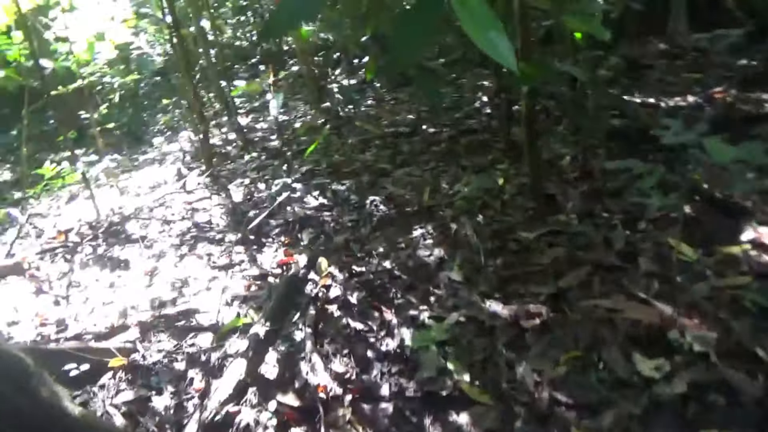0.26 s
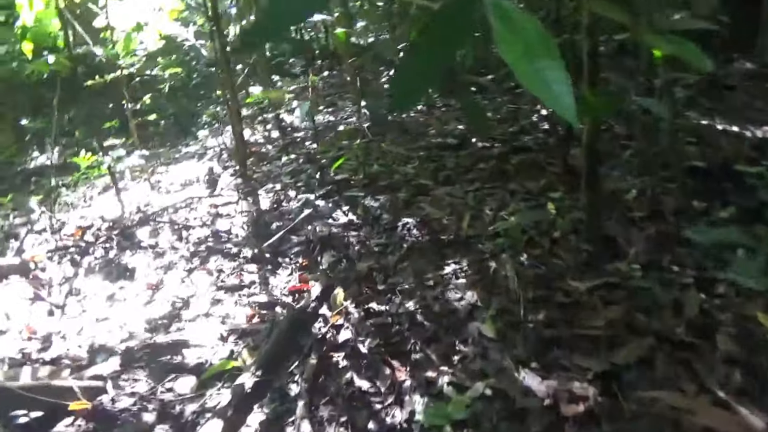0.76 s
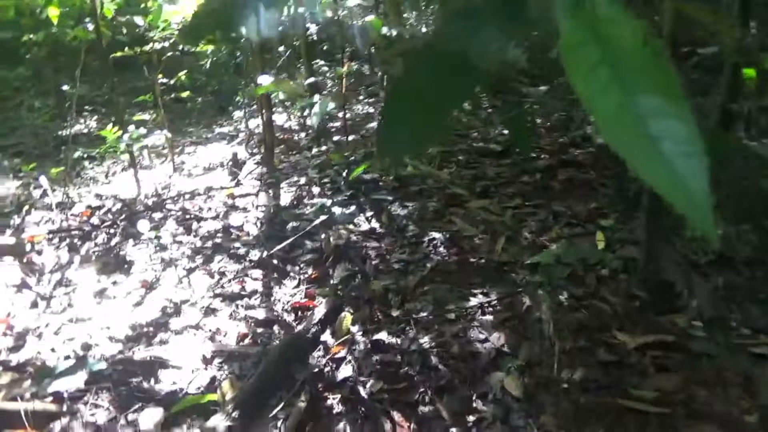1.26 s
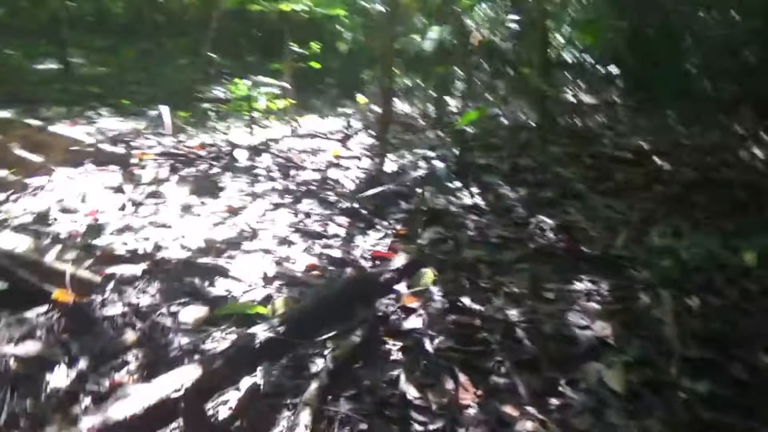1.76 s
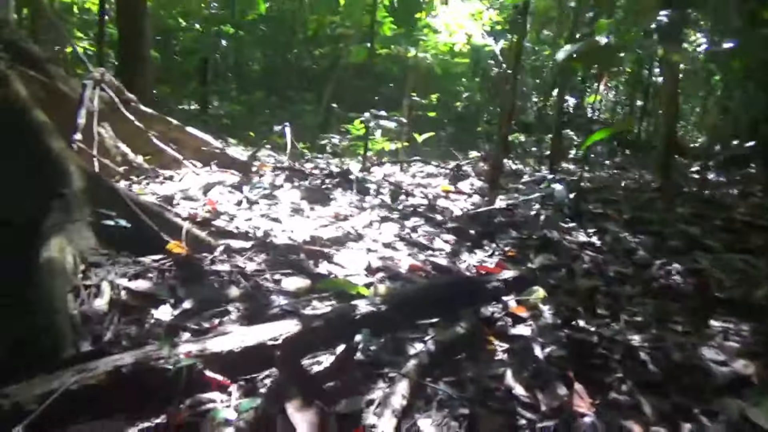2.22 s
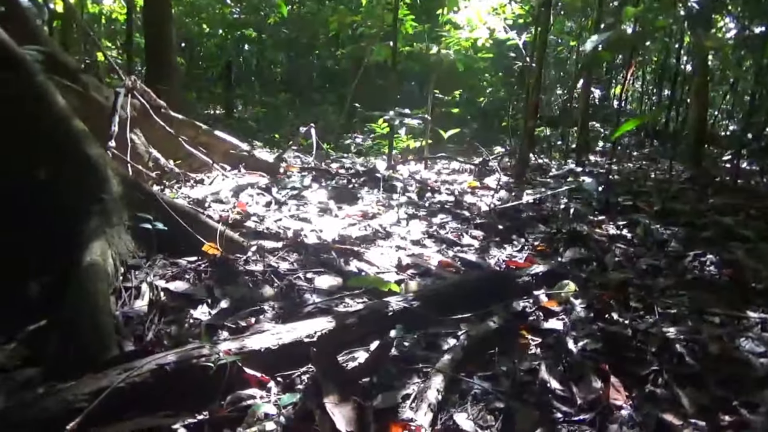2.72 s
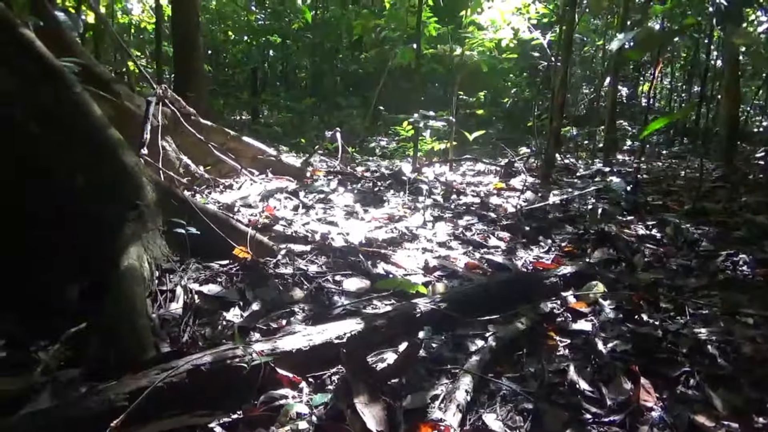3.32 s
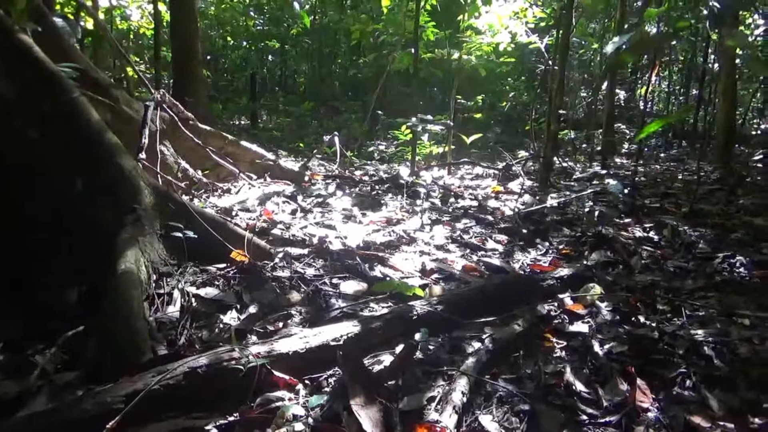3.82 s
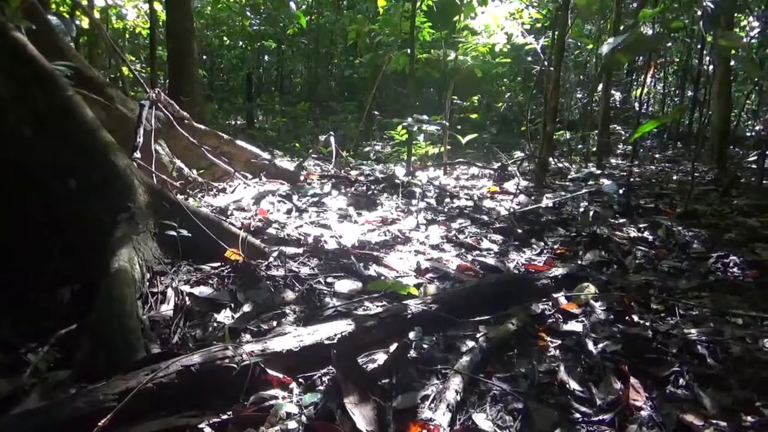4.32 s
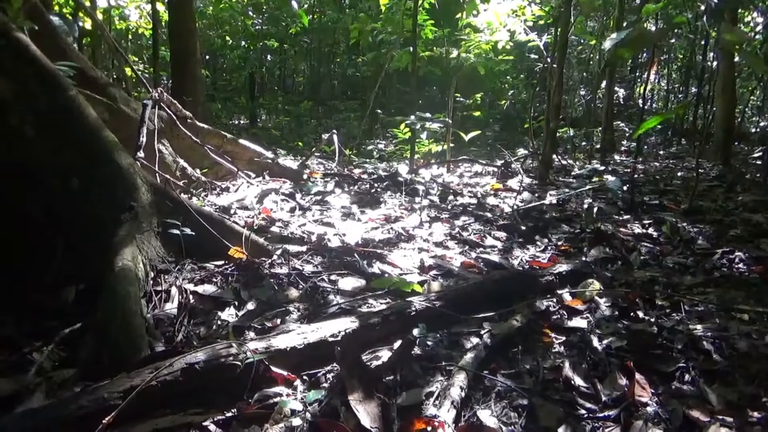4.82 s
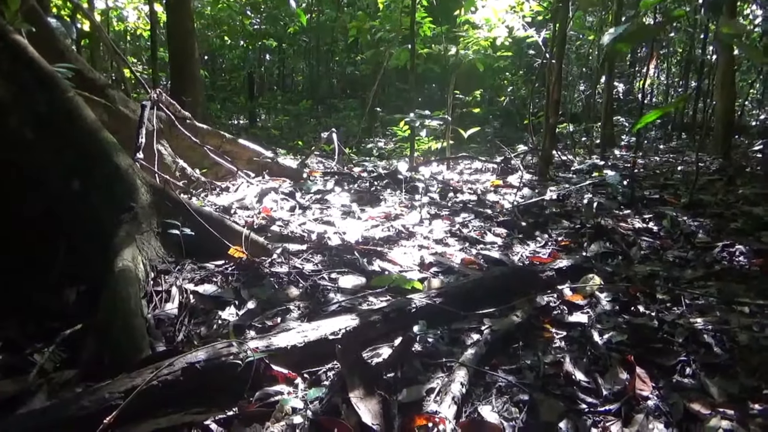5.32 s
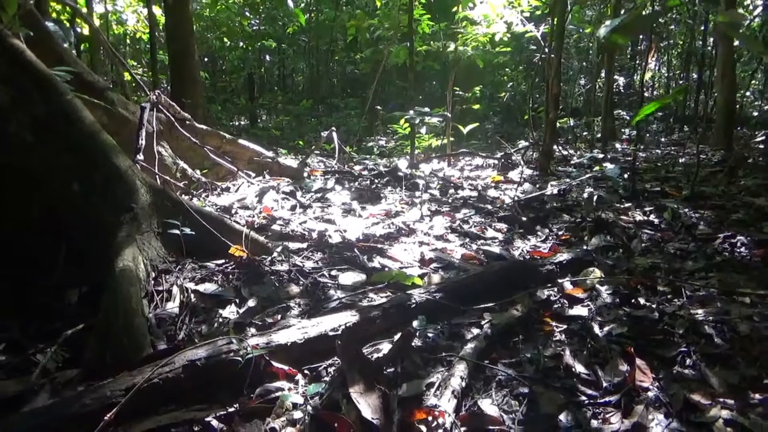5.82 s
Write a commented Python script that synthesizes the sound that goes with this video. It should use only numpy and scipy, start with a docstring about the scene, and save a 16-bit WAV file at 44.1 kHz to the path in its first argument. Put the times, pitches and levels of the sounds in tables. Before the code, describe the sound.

Throughout about six seconds, distant cicadas make a dense, shrill wash, strongest in the high treble, with a weaker mid band and a low buzzing strand that flutters and swells briefly near 1.3 and 2.5 s. Close by, dry leaf litter rustles very quietly in uneven grains, from dull scuffs to crisp crackle. At 0.2 s a tiny sharp click sounds with a soft thud; faint ticks follow at 0.8-0.9 and 1.6 s. Rustling rises around 2 s, with a woody double knock at 2.05 s and small muffled thuds until 2.5 s. From 3 to 4.4 s the litter is calmer. A faint tick at 4.5 s precedes a loud dry twig snap and thud at 4.7 s, then a small tap at 4.8 s. Soft low thuds come at 5.6 s as the rustle slightly returns. Faint low air noise underlies everything; mono, dry, dulled at the extreme top.

```python
"""A far chorus of cicadas over the floor of a tropical forest: clicks ring body resonances into a shrill wash.
Close by, leaf litter rustles as clumped grains of five colours and thuds softly as short dying tones.
Twigs tick now and then and one snaps loudly: noise bursts ring three twig resonances.
Faint low air noise lies beneath. One microphone feeds both channels, through a gain control that ducks
loud moments and a steep treble cut."""
import sys
import numpy as np
from scipy import signal
from scipy.fft import rfft, irfft, next_fast_len
from scipy.io import wavfile

SR = 44100
rng = np.random.default_rng(int(sys.argv[2]) if len(sys.argv) > 2 else 0)


def bounce(signal):
    """Save signal as a 16-bit WAV file at the path given by the first command-line argument."""
    frames = np.transpose(np.atleast_2d(signal))
    limited = np.clip(frames, -1, 1)
    pcm = np.round(limited * 32767).astype(np.int16)
    wavfile.write(sys.argv[1], SR, pcm)


N = 267687

# body resonances of the low, middle and high singers: centre_hz, width_hz, drive_db
LOW_BODY = [(1782, 178, 1), (2039, 420, -2), (2300, 200, -13), (2790, 190, -18)]
MIDDLE_BODY = [(3890, 790, -2.5), (4265, 610, -1)]
HIGH_BODY = [(5592, 1020, -2.5), (6026, 795, -0.5), (7710, 1150, -4.5), (8240, 1090, -4.5),
             (9410, 930, -8.5), (9990, 1320, -7.5)]
# swell of the low singers: time_s, level_db
LOW_SWELL = [(0, -52), (.6, -51), (1.05, -52), (1.26, -48.5), (1.6, -53), (2.1, -50), (2.36, -51.5),
             (2.49, -46), (2.6, -50), (2.95, -48), (3.4, -51), (3.9, -51), (4.45, -50), (4.97, -49.5),
             (5.3, -50.5), (5.5, -48.5), (6.07, -49.5)]
# slow swell of the other groups: time_s, middle_level_db, high_level_db
UPPER_SWELL = [(0, -56.5, -43.5), (.6, -57.5, -43.5), (1.3, -55.5, -44.5), (1.75, -57, -44.5),
               (3.4, -57.5, -45), (4.45, -55, -45), (5.2, -56.5, -45.3), (6.07, -52.5, -44.5)]

# spectra of the five litter grains, dull to crisp: frequency_hz, density_db (per Hz, relative)
SCUFF_SPECTRUM = [(40, -25), (100, -4.5), (200, 0.5), (400, 2.5), (520, 1), (800, -16)]
HOLLOW_SPECTRUM = [(300, -11.5), (480, -1), (620, 5.5), (760, 2.5), (1000, -31)]
WOODY_SPECTRUM = [(650, -27), (850, -7), (1030, 2), (1200, -7.5), (1500, -23)]
SWISH_SPECTRUM = [(1000, -53), (1200, -3.5), (1400, -0.5), (1650, 1.5), (2100, -35)]
CRISP_SPECTRUM = [(2100, -15), (2500, -2.5), (3000, -9.5), (3500, -4.5), (4200, -16.5)]
# stirring of the litter, used only as a swing about each column's mean: time_s, scuff_db, rustle_db
STIRRING = [(0.0, -56.5, -63.5), (0.27, -64, -64), (0.49, -64, -69.5), (0.67, -67.5, -65.5),
            (1.0, -66, -62.5), (1.34, -61.5, -58.5), (1.77, -64.5, -69.5), (1.96, -58.5, -56),
            (2.15, -58.5, -55.5), (2.53, -68, -59.5), (2.76, -67, -56.5), (3.31, -71, -67.5),
            (4.18, -75.5, -69), (4.56, -66, -66.5), (5.22, -72, -71.5), (5.46, -74.5, -66.5),
            (5.85, -67, -64.5), (6.07, -70.5, -61)]
# scuff, woody, swish and crisp grains:
# mean_level_db, share_of_scuff_swing, share_of_rustle_swing, grains_per_s, clumping_db
GRAINS = [(-65, 0.94, .01, 1200, 2), (-67.5, 0.18, 0.58, 3500, -0.4), (-68, .01, 1.35, 3700, 1.83),
          (-64.5, .01, 0.45, 6000, 2.8)]
# level of the hollow middle of the rustle: time_s, level_db
HOLLOW_LEVEL = [(0.0, -59), (0.49, -64.5), (1.15, -57.5), (1.39, -59.5), (1.69, -67), (1.87, -62.5),
                (2.15, -59), (2.94, -65.5), (3.62, -69), (5.22, -68.5), (5.38, -67.5), (6.07, -61)]
HOLLOW_PER_S, HOLLOW_CLUMP_DB = 2500, 2

# twig ticks and snaps: start_s, knock_rms_db, crack_rms_db, length_s,
# thinness (factor on the knock's pitch and width)
TICKS = [(0.2234, -29, -39.5, 0.00052, 1.73), (0.226, -47.5, -46, 0.015, 0.8),
         (0.764, -53, -58, .0054, 0.97), (0.792, -55, -46, 0.0079, 1.5), (.900, -50, -52.5, 0.0077, 1.04),
         (1.567, -54, -56, 0.0077, 1.1), (1.582, -52, -49, 0.016, 0.92), (1.61, -55, -52, 0.011, 1.05),
         (2.044, -41.5, -54, 0.0017, 0.84), (2.055, -39.5, -39.5, 0.002, 0.9),
         (4.5, -54, -51, 0.0077, 1.05), (4.685, -35, -38.5, 0.0049, 1), (4.692, -40, -61, .0027, 0.78),
         (4.828, -50, -60, 0.0016, 0.84)]
# twig resonances for knock, crack and splinter: centre_hz, width_hz
TWIG = [(880, 790), (2700, 1170), (7200, 4700)]
# the splinter treble equals the crack at this level and grows this much faster: only hard breaks are bright
SPLINTER_EVEN_DB, SPLINTER_GROWTH = -39.5, 4.7

# soft thuds in the litter: start_s, peak_db, pitch_hz, t60_s
THUDS = [(.227, -48.5, 730, .024), (0.24, -44, 200, .02), (.401, -45, 420, 0.043),
         (0.766, -48.5, 240, 0.033), (.900, -50, 590, .02), (1.79, -46.5, 345, .023),
         (2.0445, -32, 480, .012), (2.054, -41, 393, 0.033), (2.141, -52, 140, 0.057),
         (2.167, -44.5, 422, 0.035), (2.285, -65, 70, .041), (2.468, -47.5, 450, .02),
         (4.499, -47, 413, 0.018), (4.6845, -29.5, 485, 0.021), (4.693, -45, 354, .033),
         (4.828, -41, 505, 0.0078), (5.572, -42, 246, 0.04), (5.576, -51, 122, 0.053)]
THUD_EDGE_CYCLES = 0.69   # rise time, in cycles of the tone

# spectrum of the air noise: frequency_hz, density_db (per Hz, relative)
AIR_SPECTRUM = [(15, -16), (40, -1.5), (100, 4), (400, 0), (1000, -4.5), (1600, -18), (3000, -57)]
AIR_DB = -69
DUCK_FROM_DB, DUCK_RATIO, DUCK_RELEASE_DB_S = -41.5, 0.15, 64
CUTOFF_HZ = 11015


def from_db(db):
    """Amplitude gain is 10 to the power of dB / 20."""
    return 10 ** (np.asarray(db) / 20)


def rms_one(x):
    """Normalisation: division by the root mean square gives rms 1."""
    return x / np.sqrt(np.mean(x ** 2) + 1e-20)


def in_time(rows):
    """Linear interpolation turns each column of a curve into one value a sample."""
    time_s, *columns = np.transpose(rows)
    return [np.interp(np.arange(N) / SR, time_s, column) for column in columns]


def drift(corner_hz):
    """Two-pole lowpass noise wanders slowly, at rms 1."""
    step = 40   # samples between computed values
    settling = 2000   # values discarded while the filter settles
    pole = np.exp(-2 * np.pi * corner_hz * step / SR)
    noise = rng.standard_normal(N // step + settling + 2)
    slow = signal.lfilter([1], [1, -2 * pole, pole * pole], noise)[settling:]
    return np.interp(np.arange(N) / step, np.arange(len(slow)), rms_one(slow))


def resonance(x, hz, width_hz):
    """A damped mode is a two-pole bandpass with a peak gain of about 1."""
    radius = np.exp(-np.pi * width_hz / SR)
    zeros = (1 - radius * radius) / 2 * np.array([1, 0, -1])
    poles = [1, -2 * radius * np.cos(2 * np.pi * hz / SR), radius * radius]
    return signal.lfilter(zeros, poles, x)


def rung_twice(x, hz, width_hz):
    """Two equal modes in cascade steepen the skirts, leaving dark valleys between resonances."""
    return resonance(resonance(x, hz, width_hz), hz, width_hz)


def clicks(per_s, spread_db):
    """A random impulse train, of uneven size and sign, has rms 1 after scaling."""
    sizes = from_db(spread_db * np.minimum(rng.exponential(1, N), 5)) * rng.choice([-1, 1], N)
    return rms_one(sizes * (rng.random(N) < per_s / SR))


def coloured(x, spectrum):
    """Spectral shaping: a frequency-domain gain, interpolated over log frequency, colours x; rms 1."""
    size = next_fast_len(N)
    hz = np.maximum(np.arange(size // 2 + 1) * SR / size, 1)
    points_hz, points_db = np.array(spectrum).T
    shape_db = np.interp(np.log(hz), np.log(points_hz), points_db)
    return rms_one(irfft(rfft(x, size) * from_db(shape_db), size)[:N])


def singers(body, per_s, throb_db, throb_hz):
    """Impulse excitation: dense tymbal clicks ring each body resonance, which throbs out of step."""
    out = 0
    for hz, width_hz, drive_db in body:
        train = clicks(per_s, spread_db=1.5) * from_db(drive_db + throb_db * drift(throb_hz))
        out = out + rung_twice(train, hz, width_hz)
    return rms_one(out)


def cicadas():
    """Incoherent superposition: three groups of singers blur into one wash."""
    low_db, = in_time(LOW_SWELL)
    middle_db, high_db = in_time(UPPER_SWELL)
    low = from_db(low_db) * singers(LOW_BODY, per_s=9000, throb_db=1.63, throb_hz=13.6)
    middle = from_db(middle_db) * singers(MIDDLE_BODY, per_s=15000, throb_db=1.0, throb_hz=12)
    high = from_db(high_db) * singers(HIGH_BODY, per_s=20000, throb_db=0.33, throb_hz=11)
    return low + middle + high


def litter():
    """Granular contact noise: dry leaves give clumped random impacts, coloured by grain size."""
    scuff_db, rustle_db = in_time(STIRRING)
    hollow_db, = in_time(HOLLOW_LEVEL)
    shared_clumps = drift(9.7)
    scuff_swing = scuff_db - scuff_db.mean()
    rustle_swing = rustle_db - rustle_db.mean()

    layers = [(HOLLOW_SPECTRUM, hollow_db, HOLLOW_PER_S, HOLLOW_CLUMP_DB)]
    spectra = [SCUFF_SPECTRUM, WOODY_SPECTRUM, SWISH_SPECTRUM, CRISP_SPECTRUM]
    for spectrum, (mean_db, by_scuff, by_rustle, per_s, clump_db) in zip(spectra, GRAINS):
        level_db = mean_db + by_scuff * scuff_swing + by_rustle * rustle_swing
        layers.append((spectrum, level_db, per_s, clump_db))

    out = 0
    for spectrum, level_db, per_s, clump_db in layers:
        patchy_db = clump_db * (0.71 * shared_clumps + 1.14 * drift(9))
        grains = coloured(clicks(per_s, spread_db=2.5), spectrum)
        out = out + from_db(level_db + patchy_db) * grains
    return out


def thuds():
    """Damped oscillation: each thing that drops on the leaves gives a soft-edged, dying tone."""
    t = np.arange(4410) / SR
    out = np.zeros(N + len(t))
    for start_s, peak_db, hz, t60_s in THUDS:
        decay = from_db(-60 * t / t60_s)
        soft_edge = 1 - np.exp(-(t * hz / THUD_EDGE_CYCLES) ** 2)
        thud = np.sin(2 * np.pi * hz * t) * decay * soft_edge
        at = round(start_s * SR)
        out[at:at + len(t)] += from_db(peak_db) * thud / np.max(np.abs(thud))
    return out[:N]


def ticks():
    """Fracture excitation: a noise burst of splintering rings the twig's knock, crack and treble modes."""
    t = np.arange(4410) / SR
    out = np.zeros(N + len(t))
    for start_s, knock_db, crack_db, length_s, thinness in TICKS:
        bright_db = SPLINTER_EVEN_DB + SPLINTER_GROWTH * (crack_db - SPLINTER_EVEN_DB)
        burst = rng.standard_normal(len(t)) * np.exp(-(t / length_s) ** 3)
        at = round(start_s * SR)
        for level_db, scale, (hz, width_hz) in zip([knock_db, crack_db, bright_db], [thinness, 1, 1], TWIG):
            rung = rung_twice(burst, scale * hz, scale * width_hz)
            to_rms_one = np.sqrt(length_s * SR / np.sum(rung ** 2))   # rms taken over the burst's length
            out[at:at + len(t)] += from_db(level_db) * rung * to_rms_one
    return out[:N]


def air():
    """Broadband noise, weighted to the low frequencies, forms a steady floor."""
    return from_db(AIR_DB) * coloured(rng.standard_normal(N), AIR_SPECTRUM)


def scene():
    """Linear superposition of all sources at one microphone, which feeds both channels."""
    mix = cicadas() + litter() + thuds() + ticks() + air()
    return np.tile(mix, (2, 1))


def record(dry):
    """Gain control compresses above a threshold and lets go slowly; an elliptic lowpass cuts the top."""
    power = signal.lfilter([.004], [1, -.996], dry[0] ** 2)
    level_db = 10 * np.log10(power + 1e-12)
    # a running maximum against a rising ramp holds each peak and releases it at a constant dB rate
    ramp_db = DUCK_RELEASE_DB_S * np.arange(N) / SR
    held_db = np.maximum.accumulate(level_db + ramp_db) - ramp_db
    excess_db = np.maximum(held_db - DUCK_FROM_DB, 0)
    duck_db = signal.lfilter([.003], [1, -.997], DUCK_RATIO * excess_db)   # smoothed
    # order 16, 0.3 dB ripple, 90 dB stopband
    lowpass = signal.ellip(16, .3, 90, CUTOFF_HZ, fs=SR, output="sos")
    return signal.sosfilt(lowpass, dry * from_db(-duck_db))


dry = scene()
out = record(dry)
bounce(out)
```